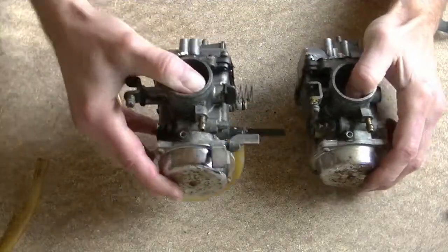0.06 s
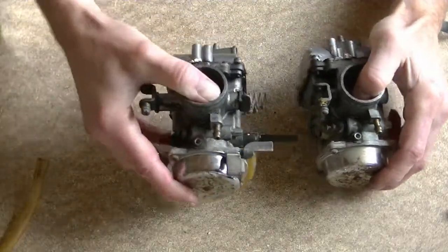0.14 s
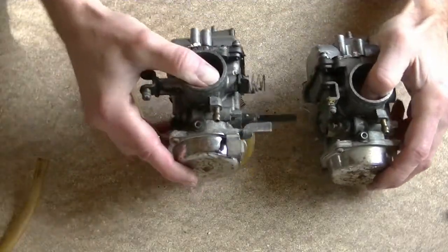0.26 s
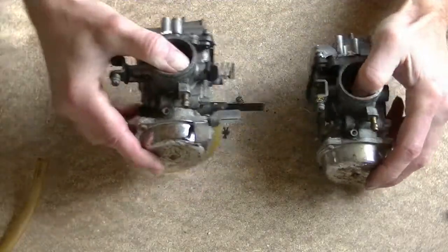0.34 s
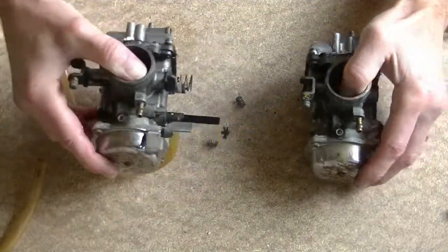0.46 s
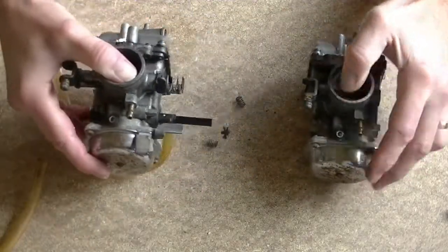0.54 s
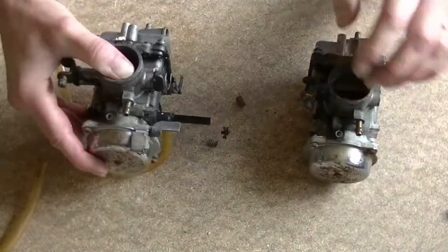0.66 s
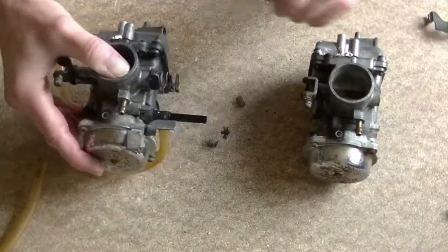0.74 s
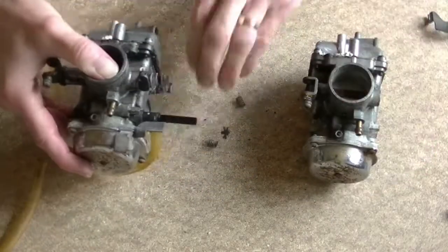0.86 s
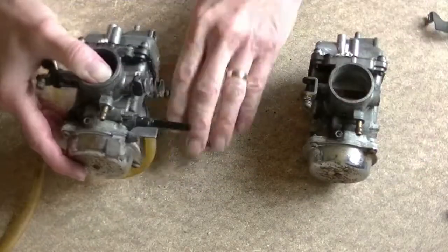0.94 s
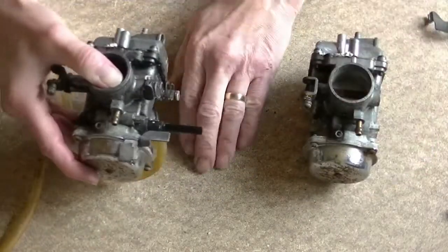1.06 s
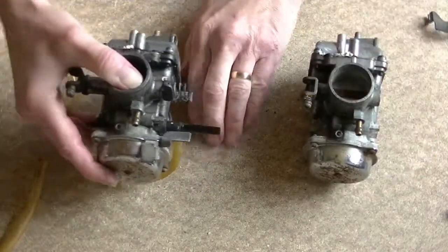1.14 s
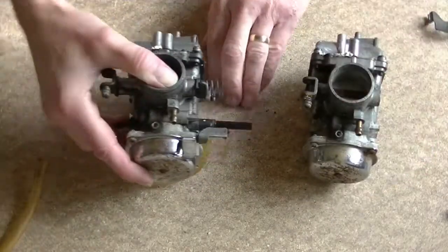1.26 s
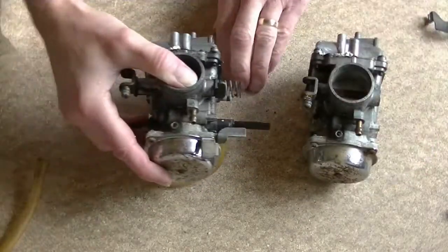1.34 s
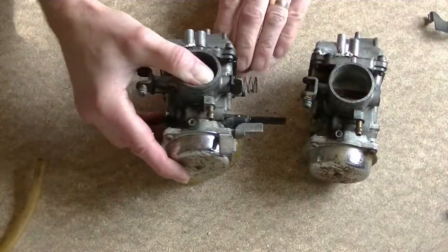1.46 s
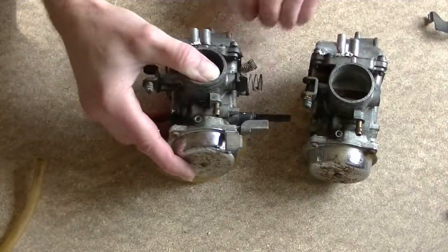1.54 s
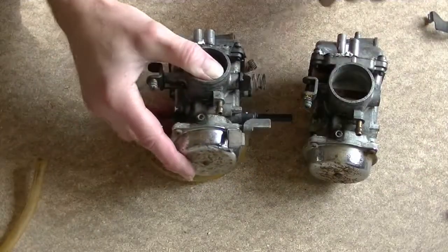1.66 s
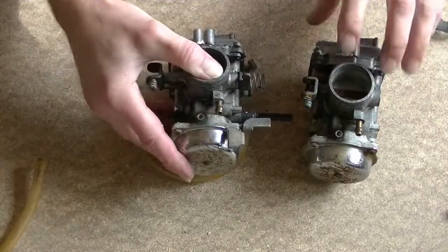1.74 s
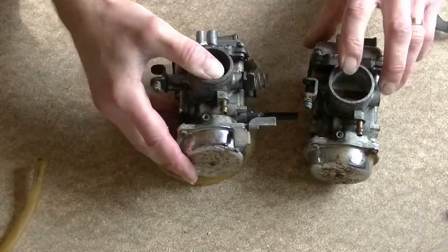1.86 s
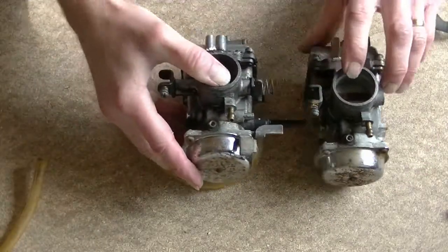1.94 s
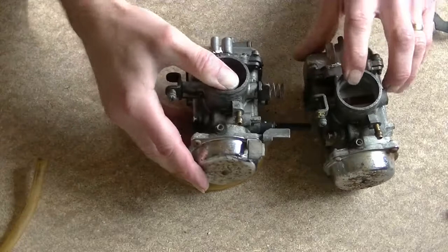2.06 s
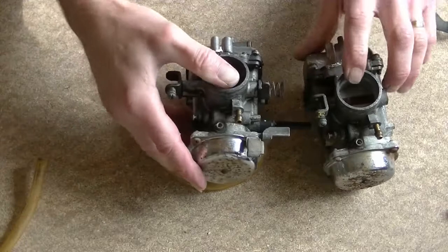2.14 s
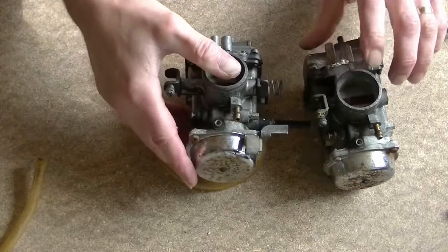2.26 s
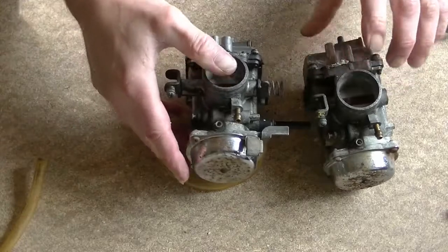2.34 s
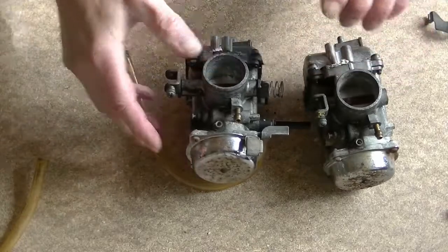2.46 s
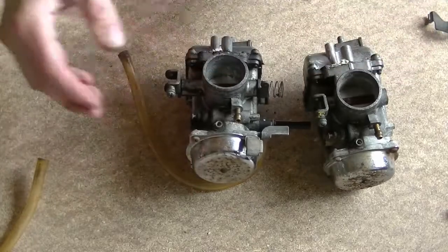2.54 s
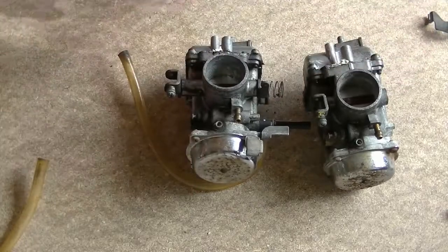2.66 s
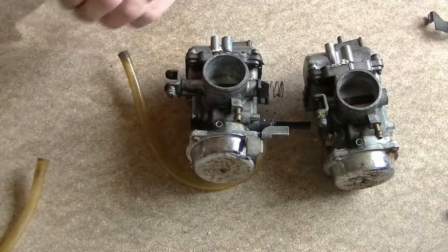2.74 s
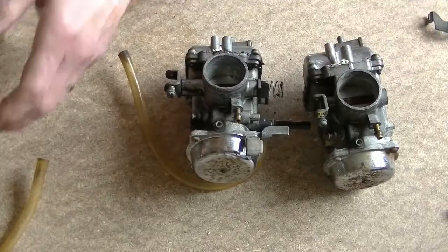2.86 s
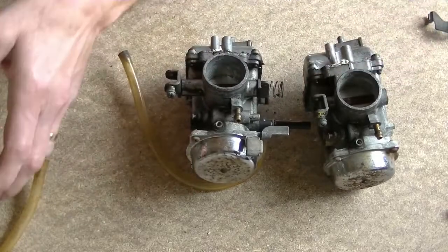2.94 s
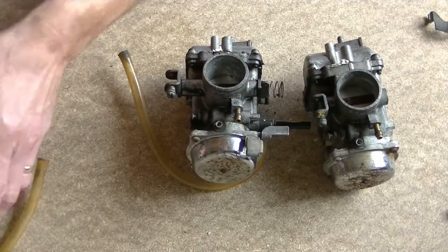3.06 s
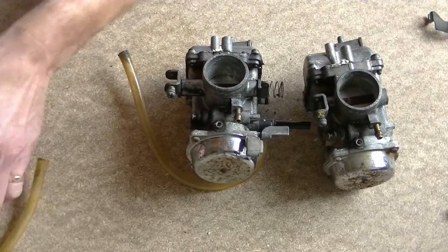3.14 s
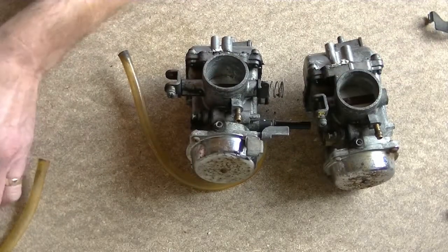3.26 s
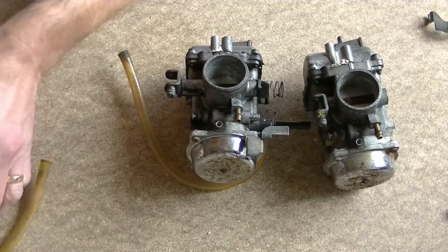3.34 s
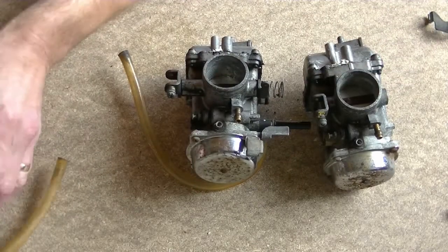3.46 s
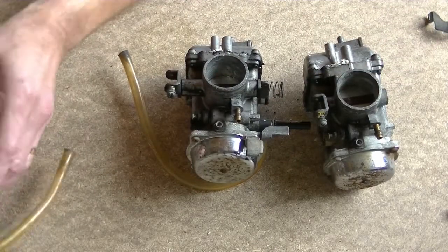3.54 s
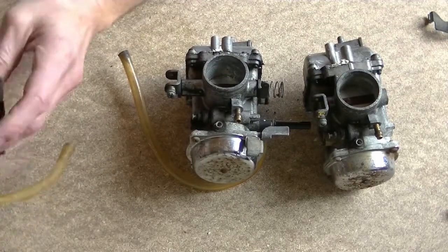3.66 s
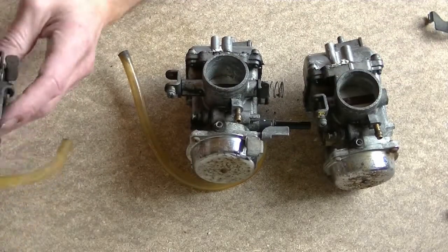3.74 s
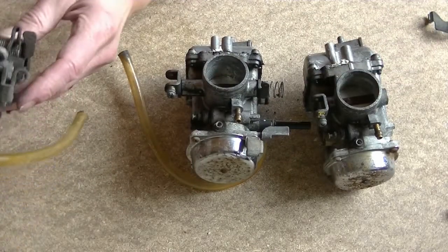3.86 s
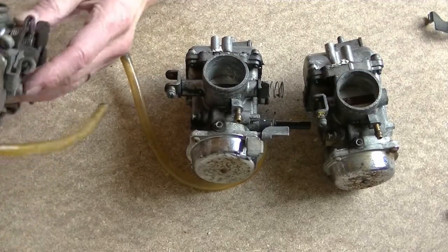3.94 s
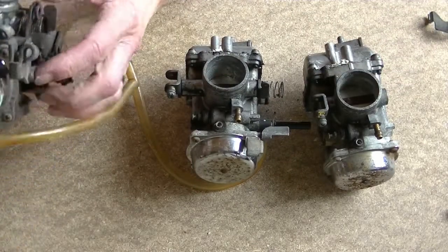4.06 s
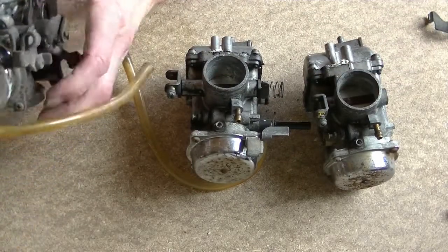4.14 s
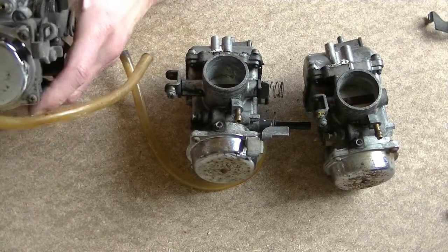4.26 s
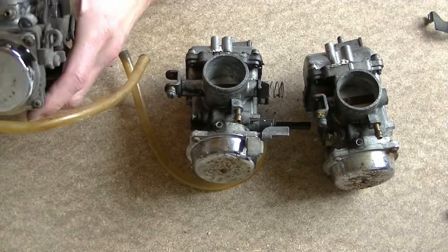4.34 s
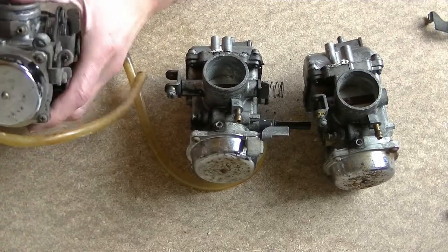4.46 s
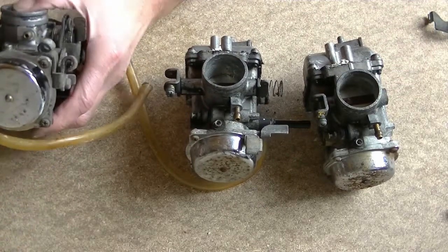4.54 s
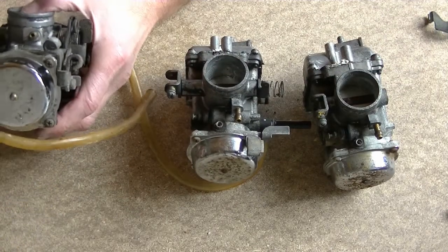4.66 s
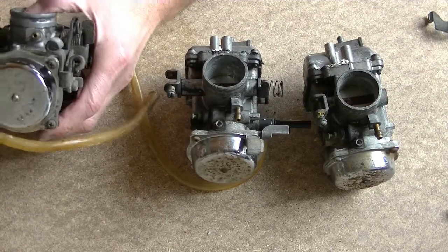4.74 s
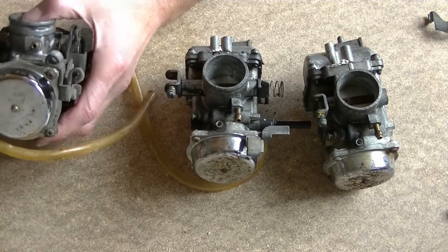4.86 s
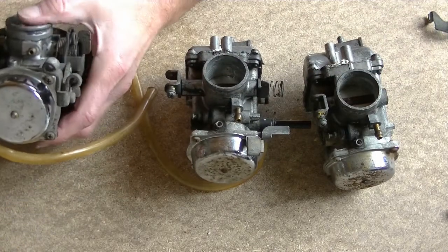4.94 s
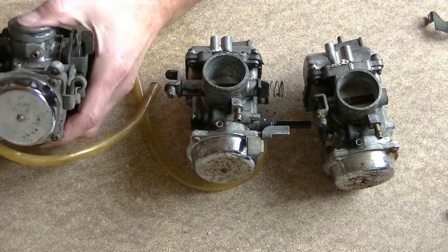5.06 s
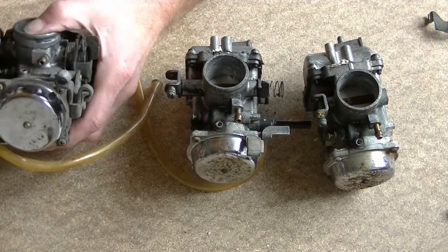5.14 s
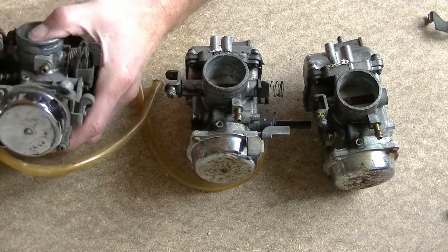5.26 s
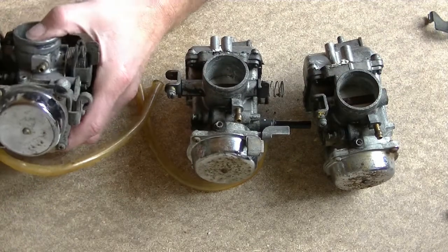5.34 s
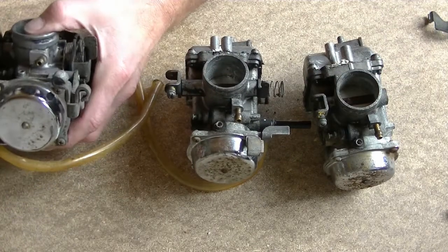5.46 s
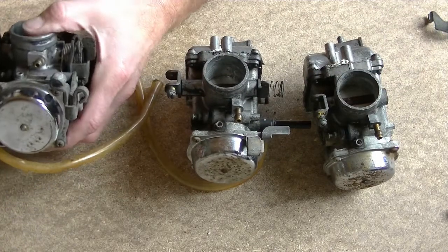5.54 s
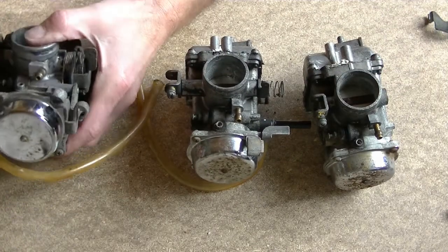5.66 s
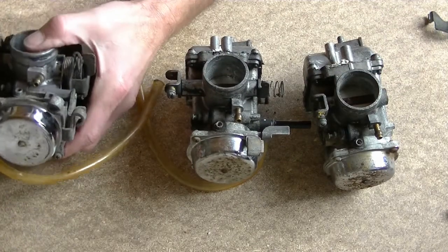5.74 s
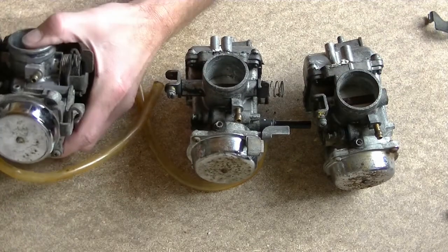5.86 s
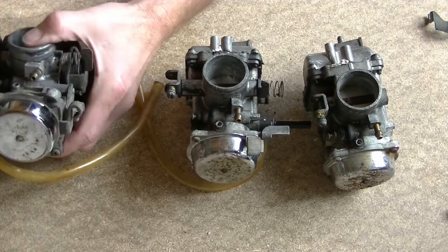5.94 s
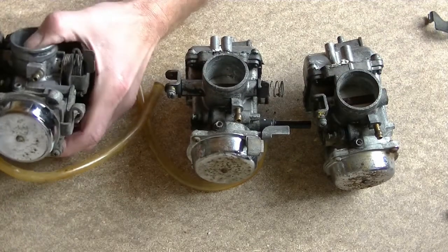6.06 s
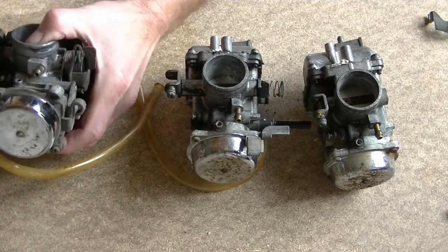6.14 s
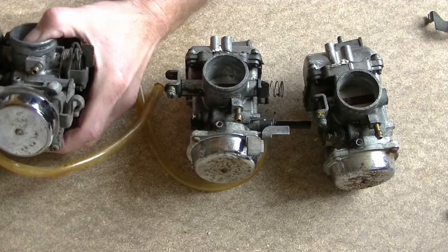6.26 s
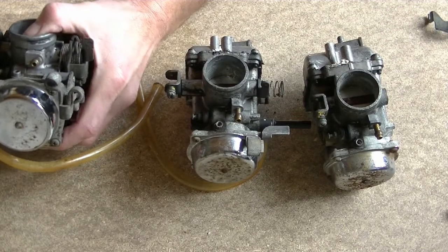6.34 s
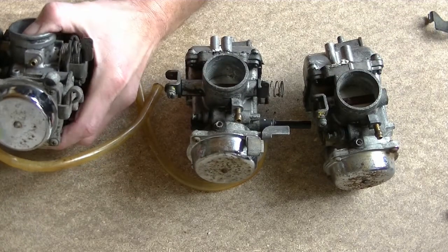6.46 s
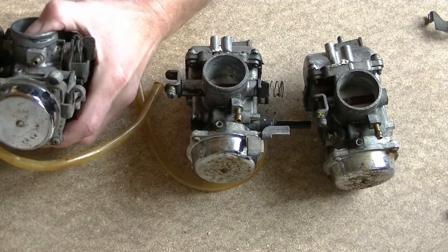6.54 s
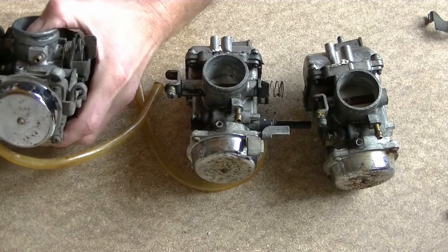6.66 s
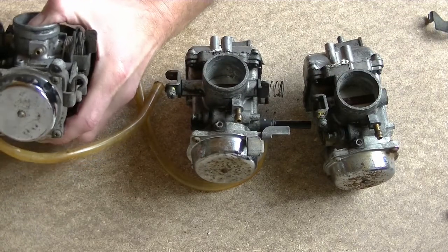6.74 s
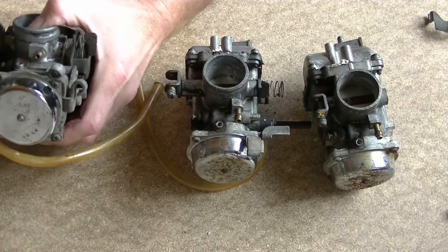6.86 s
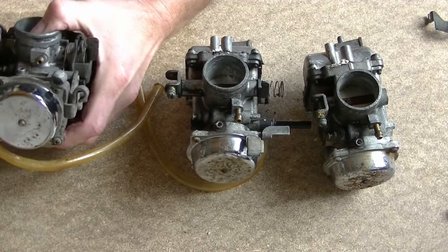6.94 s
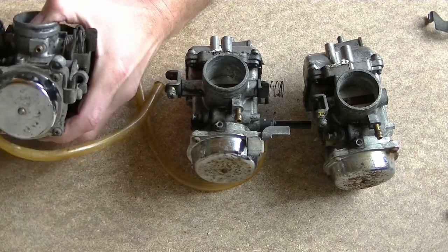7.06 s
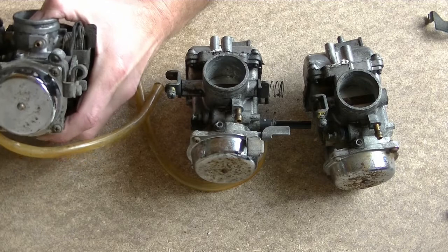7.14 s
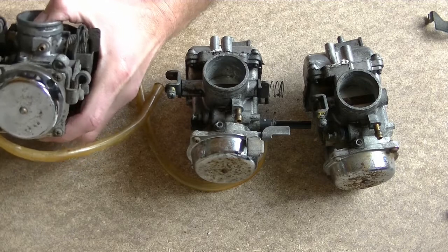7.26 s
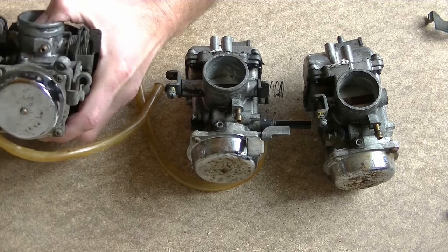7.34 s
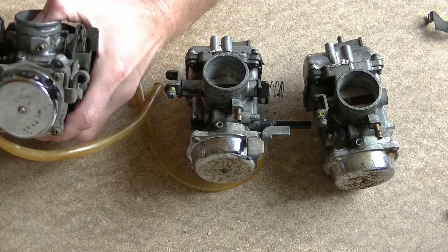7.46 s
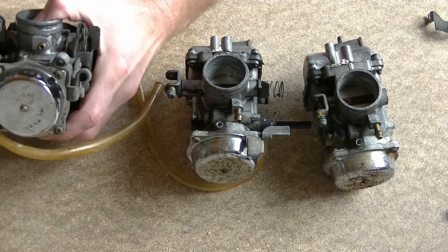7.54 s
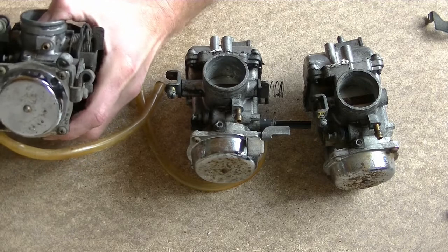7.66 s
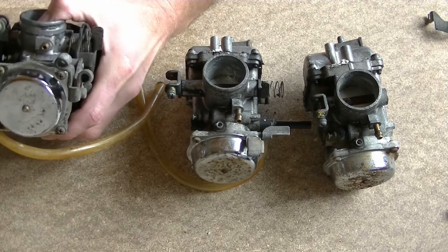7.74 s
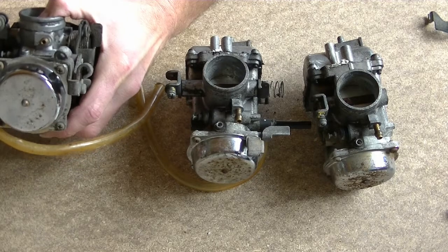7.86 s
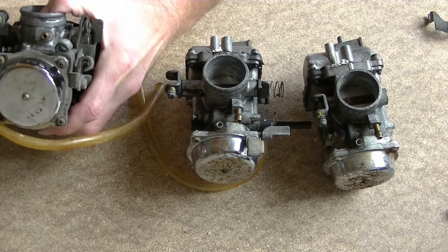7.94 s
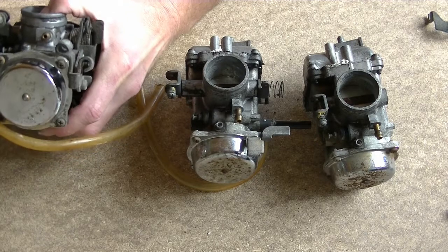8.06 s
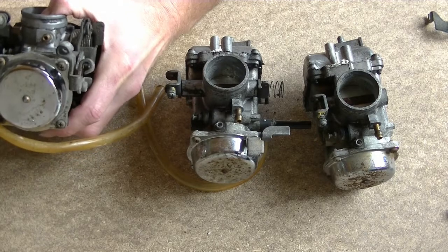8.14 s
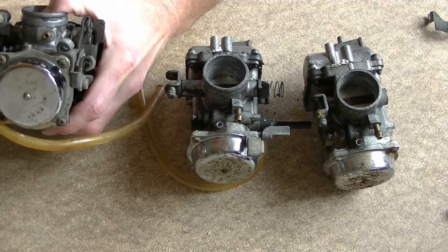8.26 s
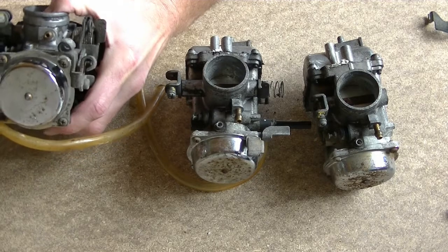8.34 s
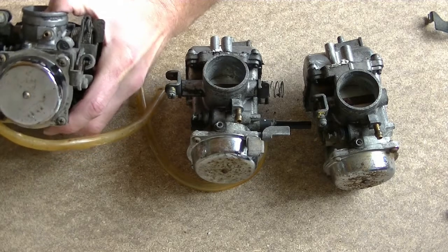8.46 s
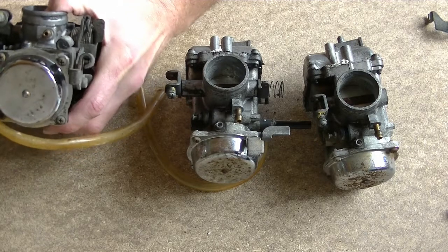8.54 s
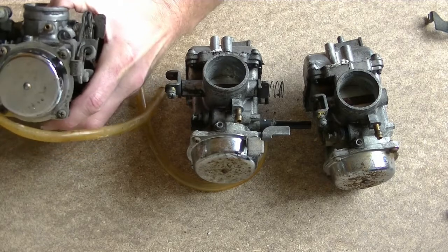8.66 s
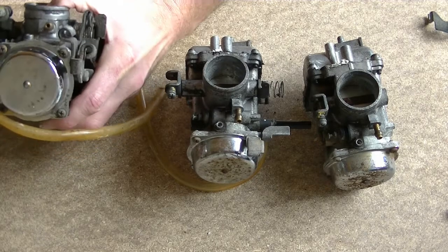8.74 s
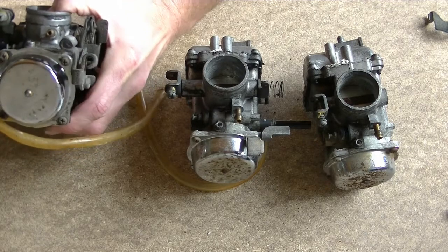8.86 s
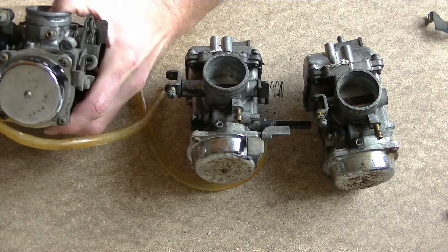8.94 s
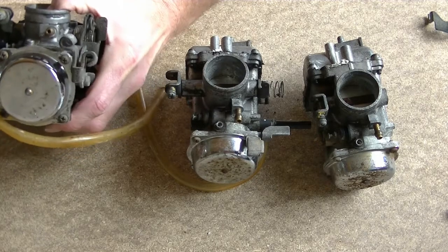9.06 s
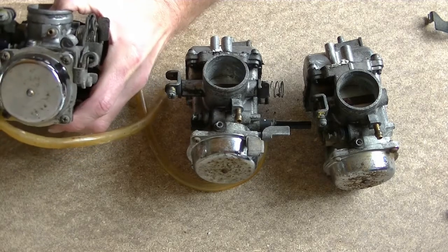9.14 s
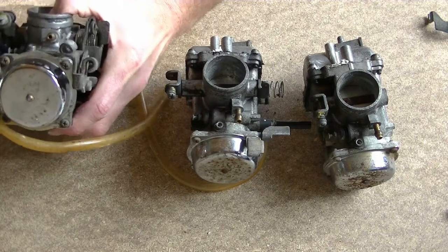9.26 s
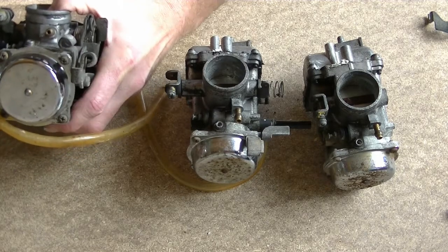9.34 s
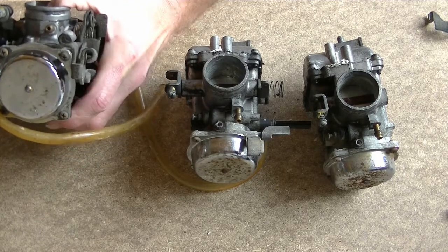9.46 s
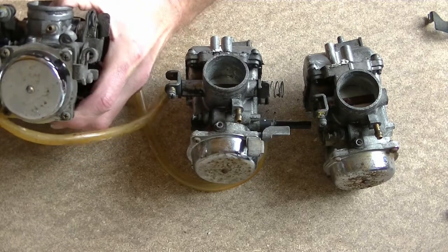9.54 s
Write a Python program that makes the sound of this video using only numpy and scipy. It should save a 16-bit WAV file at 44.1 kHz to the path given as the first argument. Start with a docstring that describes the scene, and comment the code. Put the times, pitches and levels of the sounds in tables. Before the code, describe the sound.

Metal bodies handled on carpet, heard by a nearby stereo microphone with constant soft hiss. A hard clunk comes almost at once, with quick knocks and tiny metallic ticks behind it. Dry brushing, a second knock and short dragging rubs follow. The middle turns quiet, with hose-like rustles, small clicks and muffled bumps; the last second brings low, hollow thuds and a short rub.

```python
"""Carburettors on a carpeted floor

Heavy metal carburettors are set down, dragged and turned by hand on carpeted boards, close to a camera.
Landings ring decaying sines of the boards and castings; small parts tick as short resonant noise.
Hands, hoses and castings rub over the pile as flickering noise, slips squeak, shifting weight thumps.
A small furnished room answers, over the steady hiss of the microphone.
"""
import sys
import numpy as np
from scipy import signal
from scipy.fft import rfft, irfft, next_fast_len
from scipy.io import wavfile
from scipy.ndimage import map_coordinates

SR = 44100
rng = np.random.default_rng(int(sys.argv[2]) if len(sys.argv) > 2 else 0)


def waveform_to_disk(signal):
    """Save audio, clipped to [-1, 1], as 16-bit WAV at the path in sys.argv[1]."""
    frames = np.transpose(np.atleast_2d(signal))
    scaled = np.clip(frames, -1, 1) * 32767
    samples = np.round(scaled).astype(np.int16)
    wavfile.write(sys.argv[1], SR, samples)


N = 422919  # length in samples

# Landings on the carpet, close to the camera; levels are relative:
# start_s, strength_db, boom_db, hollow_db (ring of the casting), clack_db, favoured pitch_hz,
# damping (1 = the listed t60_s, more = shorter ring, less = longer, 0.3 at least),
# shudder_db (drumming afterwards)
LANDINGS = [(0.071, -52, 3, -3, 19, 142.5, 0.6, -80), (0.12, -38, -8, 7, 13, 228.8, 1.33, -70.5),
            (0.384, 6, -19, 0.8, 2.5, 670, 2, -22), (0.54, -31.5, -35, 7, 16, 233, 0.61, -49.5),
            (0.58, -5.5, -10.5, -2.5, -11, 333, 1.5, -44.5),
            (0.613, -6, -13.5, -11, -15, 344.3, 2.3, -41.5),
            (0.636, -16.5, -13, -21, -8, 297.7, 1.6, -42.5), (1.045, -43.5, -26, 3, -2, 568.6, 1.5, -65.5),
            (1.089, -39.5, -27, -2, 7, 583, 0.51, -64.5), (1.592, -42.5, -1, -4, 8, 161.5, 0.51, -65.5),
            (1.677, -5, -15.5, -9.5, -0.5, 560, 1.48, -48.5), (1.885, -28, -37, -16, 9.5, 594, 0.26, -60),
            (2.03, -29, -3.5, -1, 11.5, 596.4, 1.05, -55), (2.821, -37.5, -10.5, 4.5, 0.5, 668, 1.27, -55),
            (2.91, -44, -18, -1, -3, 501, 1.84, -74.5), (3.077, -31, -9.5, 1.5, 8, 190, 1.34, -59.5),
            (3.339, -33, -16, 7, 14, 705, 1.7, -53), (3.549, -42.5, -8, -6, -5, 250, 1.6, -64.5),
            (3.643, -33, -13.5, 4, -11, 240.4, 1.9, -56.5), (3.805, -35, -16, -5, -0.5, 261, 1.7, -62),
            (4.136, -33, -4, -6, -2.2, 580, 1.4, -57), (4.45, -27.5, -10, -1, -7, 659, 2.8, -52),
            (5.136, -23, -11, 1.5, 3.2, 660, 2.1, -53.5), (5.42, -47.5, -1, -2.5, 17.5, 576.3, 1.5, -69.5),
            (5.689, -36, -10, 5, -8, 105.6, 0.89, -58), (7.148, -30.5, -5.5, 0.5, 6, 1000, 1, -58),
            (7.362, -32, 4.5, -0.5, -24, 134, 1.7, -60.5), (7.752, -46, -9, -3, 8.5, 200, 1.8, -75.5),
            (7.842, -38, -12.5, 3.5, 8, 132, 2.1, -67.5), (7.905, -42.5, -4, 2.2, 9, 735.5, 0.88, -69),
            (8.649, -20.5, 2, -2.2, -6.5, 150, 1.8, -39.5), (8.966, -51, 11.5, 1, 1.2, 164, 1.4, -60),
            (9.269, -47, -1.2, 2.2, 11, 1100, 1.1, -69), (9.288, -11.5, 1, 5, 4, 144, 2.9, -30),
            (9.411, -30, 8, -6, 6.5, 250, 2, -43.5)]
# Modes of floorboards and castings: pitch_hz, level_db (relative), t60_s (at damping 1)
BOARD_MODES = [(104, -26, 0.3), (136, 2, 0.3815), (189.3, -0.5, 0.3), (214, 0, 0.31), (249, 0.5, 0.376),
               (271.6, -1.5, 0.2), (343.2, -3, 0.28), (408.7, -10, .2), (477, -13.5, 0.067),
               (586.4, -2.5, 0.077), (596.4, -9, 0.077), (680, -2, 0.15), (712, -2, 0.082),
               (802.6, -6.5, 0.11), (869, -5.5, 0.1477), (970, -16, .15), (1126, -7.5, 0.13),
               (1206, -12, .1), (1320, -12, 0.18), (1452, -13, 0.1), (1620, -19.5, 0.044),
               (1770, -16, 0.092), (1954, -30.5, 0.39), (2166, -17, 0.094), (2465, -29, 0.302),
               (2880, -32, 0.16)]
# Crowd of weak modes, read between points: pitch_hz, level_db (relative), t60_s (at damping 1)
WEAK_MODES = [(120.1, -12, 0.11), (700, -9, 0.18), (1404, -18.5, 0.15), (2916, -26, 0.077),
              (7010, -45, 0.054)]


def knocks(count=70):
    """Each landing rings the boards and a crowd of weak modes; the spot struck favours one pitch."""
    out, t = np.zeros(N + SR), np.arange(SR // 3) / SR
    board_hz, board_db, board_t60 = np.transpose(BOARD_MODES)
    weak_levels = [(hz, db) for hz, db, _ in WEAK_MODES]
    weak_t60s = [(hz, t60) for hz, _, t60 in WEAK_MODES]
    chance = rng.standard_normal((len(LANDINGS), 2, len(BOARD_MODES) + count, 1))
    scatter = np.exp(0.033 * rng.standard_normal((len(LANDINGS), count)))
    crowds = np.geomspace(150, 7000, num=count) * scatter
    # neighbours in the crowd start in opposition
    phase = np.append(np.ones(len(BOARD_MODES)), np.resize([1, -1], count))[:, None]
    rise = 1 - np.exp(-t / .0005)
    for landing, (size, tune), crowd in zip(LANDINGS, chance, crowds):
        s, db, boom_db, hollow_db, clack_db, spot_hz, damping, _ = landing
        hz = np.append(board_hz, crowd)[:, None]
        level = np.append(board_db, along(weak_levels, crowd))[:, None]
        t60 = np.append(board_t60, along(weak_t60s, crowd))[:, None] / max(damping, .3)
        colour_points = [(180, boom_db), (400, 0.0086), (600, 0.0029), (800, hollow_db), (1400, clack_db)]
        colour = along(colour_points, hz)
        favour = 7 * np.exp(-np.log2(hz / spot_hz) ** 2 / 0.034)
        decay = np.exp(-np.log(1000) * t / t60)
        gain = phase * amp(level + colour + favour + 2.84 * size) * decay
        ring = np.sum(gain * np.sin(2 * np.pi * hz * (1 + 0.0067 * tune) * t), axis=0)
        out[round(s * SR):][:len(t)] += amp(db - 15.5) * rise * ring
    return out[:N]


# Small metal parts touching: start_s, level_db (peak before panning), pitch_hz,
# pan_db (left over right), bright_db (bright ring, relative)
PART_TICKS = [(0.1187, -36, 2500, 2, -4.5), (0.385, -24, 1960, -2.5, -1), (0.4599, -35, 1760, 1, -3),
              (0.5058, -25, 2273, 3, -19), (0.541, -41, 1730, -1.5, -6), (0.5504, -38, 1810, 0.5, -6),
              (0.5799, -34.5, 2590, 0, -2), (0.613, -41, 1830, -0.5, -6.5),
              (0.634, -41.5, 1966, -0.5, -3.5), (1.1763, -28.5, 3230, 4.5, -14),
              (1.4822, -34.5, 1680, 3, -6.5), (1.6767, -42.5, 1622, 2, 1), (1.822, -34, 1700, 2, -6),
              (1.9644, -32.5, 2080, 1, -8), (2.0313, -32, 2090, 0.5, -2), (2.0918, -37.5, 3160, 3, -16),
              (2.3365, -41.5, 2690, -6, -13.5), (3.4386, -35.5, 4120, 1.5, 9),
              (4.0537, -37, 3050, 2.5, 2.5), (4.137, -31.5, 2890, 0.1, -26),
              (4.357, -38.5, 2700, -2.5, -9.5), (4.452, -44.5, 1955, 2, 2.5), (4.538, -41.5, 2418, 4, 5),
              (5.4213, -43.5, 2070, 1.5, -10), (7.1536, -46, 2035, 2, 5), (7.8477, -48, 2040, 2, -9),
              (7.9625, -37, 1776, 1.5, -7), (8.1414, -49, 4530, 4, 2.5), (8.6488, -39.5, 2104, 0, -16),
              (9.2898, -45, 1750, 4, 1)]
TICK_T60_S = .016  # decay of the noise that drives the tick


def ticks():
    """A short crack of noise, ringing around one pitch and in a bright mode of the casting."""
    out, t = np.zeros((2, N + SR)), np.arange(SR // 8) / SR
    noises = rng.standard_normal((len(PART_TICKS), len(t)))
    for (s, db, hz, pan_db, bright_db), noise in zip(PART_TICKS, noises):
        modes = resonances([(hz, 0.27 * hz, 0), (4800, 900, bright_db), (8000, 6000, bright_db - 16.5)])
        crack = filtered(noise * amp(-60 * t / TICK_T60_S), modes)
        crack = amp(db) * crack / np.max(abs(crack))
        out[:, round(s * SR):][:, :len(t)] += panned(crack, np.full(len(t), pan_db))
    return out[:, :N]


# Strokes over the pile; rise and fall are times for 20 dB: start_s (full level), rise_s, hold_s, fall_s,
# rasp_db, bright_db (fuzz over rasp), drum_db (boards), drum pitch_hz (centre), ring of the casting (0-4)
PILE_STROKES = [(.07, 0.044, 0.065, 0.16, -61, -2.5, -56, 228, 1.1),
                (0.222, 0.0588, .01, 0.081, -61, -12, -62.5, 392, 1),
                (.41, .02, .02, .15, -41, -19.5, -39.5, 600, .6),
                (0.504, .006, 0.0023, 0.052, -42, -28, -43, 624, .4),
                (0.548, .06, 0.0078, 0.017, -45.5, -24.5, -31, 381.3, 1),
                (.69, .04, .08, .08, -56.5, 0.5, -55, 259.5, 0.81),
                (0.989, .05, .005, 0.038, -59, -9.5, -55, 370.6, 1.8),
                (1.135, .07, 0.032, .02, -48.5, -2, -60.5, 722, 1.6),
                (1.173, .01, 0.13, 0.17, -39, -5, -58, 620, 2.58),
                (1.414, .1, 0.078, 0.078, -51.5, -17, -55, 790, 0.77),
                (1.578, .03, 0.15, .02, -67, -3, -61.5, 190, 1.2),
                (1.824, .025, 0.0027, 0.029, -48, -6, -64, 534, 0.9),
                (1.877, .06, 0.088, 0.15, -46, -11, -39, 577, 2.8),
                (2.044, 0.023, .003, 0.044, -44, -7, -43, 445, 3.5),
                (2.823, 0.0097, 0.0055, .11, -53.5, -8, -61.5, 588, 1.2),
                (3.086, 0.055, 0.077, 0.058, -57.5, -5.5, -56.5, 500, 1.14),
                (3.22, 0.058, 0.0036, .02, -67, -2, -54.5, 399.6, 1.2),
                (3.393, 0.087, 0.0043, 0.042, -51, -18, -43.5, 516, 1.3),
                (3.434, .008, .003, 0.1, -54.5, -1, -51, 510, 1.5),
                (3.488, .012, .13, 0.034, -51, -0.5, -57, 301.7, 0.9),
                (3.647, 0.049, 0.0053, .1, -53.5, 5, -56.5, 300, 1.8),
                (3.683, .05, 0.45, 0.046, -57.5, 2.5, -64.5, 269.6, 1.33),
                (3.9, .04, .01, .08, -53, 0.13, -62, 248.8, 1.2),
                (4.136, 0.048, .003, 0.041, -40.5, -3, -51.5, 344.5, 1.4),
                (4.173, 0.016, 0.04, 0.13, -50, -3, -59.5, 200, 0.68),
                (4.297, .02, 0.14, 0.022, -67.5, -3, -67.5, 321, 1.8),
                (4.454, .012, .11, 0.16, -53, -4, -61, 504, 1.28),
                (4.734, 0.16, .005, 0.061, -64.5, -3, -60, 461, 1.3),
                (4.813, .05, .005, 0.047, -65.5, 7.5, -62.5, 404, 1.36),
                (4.994, .15, 0.006, 0.056, -62.5, -0.5, -63.5, 300, 1.4),
                (5.119, .07, .005, 0.019, -58, -10.5, -59.5, 680, 0.78),
                (5.687, .07, .01, .13, -64, -11, -47, 260, 1.1),
                (7.15, .04, .01, .07, -60, -5, -43, 300, 1.2),
                (7.579, .03, 0.15, 0.22, -67.5, -0.5, -62, 328.7, 1),
                (7.972, 0.042, 0.0039, 0.025, -54.5, -9.5, -54.5, 357, 0.95),
                (8.294, .02, .003, 0.048, -62, -5, -68.5, 389, 1.3),
                (8.761, .03, .005, 0.12, -73, -7.5, -54.5, 196.3, 1.3),
                (8.859, .06, 0.035, .04, -72.5, -7.5, -58, 220, 1.1),
                (8.985, 0.068, .005, 0.097, -62.5, -17, -46.5, 189.5, 1.13),
                (9.129, .05, 0.046, .05, -69, -8.5, -61, 299, 0.95),
                (9.32, .03, .03, .05, -54, -10, -49.5, 230, 1.3),
                (9.568, .1, 0.0047, 0.051, -57, -13.5, -59, 300.3, .9)]
# Rasp of the pile: pitch_hz, level_db (per Hz, relative)
RASP_SPECTRUM = [(240, -58.5), (400, -36), (574, -11.5), (895, -2), (1050, -2), (1170, -3), (1890, 0.5),
                 (2680, -3), (3270, -3.5), (6500, -20), (8450, -43), (14300, -120)]
# Finest fibres: pitch_hz, level_db (per Hz, relative)
FUZZ_SPECTRUM = [(2940, -15), (5000, 1.5), (6160, -3), (7600, -4), (7940, -6.5), (13800, -14), (16000, -19)]
# Hollow of the dragged casting: pitch_hz, width_hz, level_db (relative)
CASTING_MODES = [(551.4, 59.5, 4.5), (694, 67, -5), (1322, 14, -11), (2120, 76.1, 1), (2730, 23, -4),
                 (3285, 31, 0.5), (3706, 62, -11.5), (4710, 181.2, -0.5), (5337, 140, -16)]
# centre of a dull rasp, its climb at brightness 0 dB; left over right
RASP_HZ, BRIGHT_HZ, RASP_PAN_DB = 1800, 1500, 0.3


def strokes():
    """Fibres flick past the moving part; the drag also shakes the casting and the boards."""
    (rasp_gain, fuzz_gain, drum_gain), (rasp_hz, drum_hz, ring) = stroke_controls()
    flicks = filtered(fibres(2.3, 260), lambda f: amp(along(RASP_SPECTRUM, f)))
    rasp = moving_hump(flicks, rasp_hz, 5.4, .5, size=512)
    rasp = rasp + np.clip(ring, 0, 4) * 0.44 * unit(filtered(flicks, resonances(CASTING_MODES)))
    fuzz, spread = (unit(filtered(fibres(1.27, 350), lambda f: amp(along(FUZZ_SPECTRUM, f))))
                    for _ in "ab")
    boards = resonances([(hz, 6.7 / t60, db) for hz, db, t60 in BOARD_MODES])
    drum = moving_hump(filtered(fibres(2.5, 120), boards), drum_hz, 11.0, 1.0, size=2048)
    wide = 0.4 * fuzz_gain * spread * [[1], [-1]]  # short waves reach the two microphone ports unalike
    rubbing = panned(rasp_gain * rasp + fuzz_gain * fuzz, np.full(N, RASP_PAN_DB))
    return rubbing + wide + drum_gain * drum


def stroke_controls():
    """Gains of rasp, fuzz and drumming, then centres and ring; where strokes overlap the louder one leads."""
    t, power = np.arange(N) / SR, np.full((3, N), 1e-12)
    lead = power * [[RASP_HZ], [SHUDDER_LOW_HZ], [1]]
    for s, rise, hold, fall, rasp_db, bright_db, drum_db, drum_hz, ring in PILE_STROKES + shudders():
        span = slice(max(int((s - 2 * rise) * SR), 0), int((s + hold + 3 * fall) * SR))
        slopes = np.minimum((t[span] - s) / rise, (s + hold - t[span]) / fall)
        shape_db = 20 * np.minimum(slopes, 0)
        rasp, fuzz, drum = (amp(2 * (shape_db + db)) for db in (rasp_db, rasp_db + bright_db, drum_db))
        power[:, span] += [rasp, fuzz, drum]
        centre_hz = RASP_HZ + BRIGHT_HZ * min(amp(bright_db), 1.3)
        lead[:, span] += [rasp * centre_hz, drum * drum_hz, rasp * ring]
    return np.sqrt(power), lead / power[[0, 2, 0]]  # averages weighted by power


# rasp under the drumming, brightness, lowest drumming centre, ring of the casting
SHUDDER_RASP_DB, SHUDDER_BRIGHT_DB, SHUDDER_LOW_HZ, SHUDDER_RING = -23.5, -17.5, 215, 0.28
# delay after the landing to full level, then rise and fall for 20 dB around the hold
SHUDDER_DELAY_S, SHUDDER_RISE_S, SHUDDER_HOLD_S, SHUDDER_FALL_S = .014, 0.004, 0.022, 0.085


def shudders():
    """A landed casting shudders on the pile: a short stroke, drumming near the landing's favoured pitch."""
    rows = []
    for s, *_, spot_hz, _, db in LANDINGS:
        times = (s + SHUDDER_DELAY_S, SHUDDER_RISE_S, SHUDDER_HOLD_S, SHUDDER_FALL_S)
        levels = (db + SHUDDER_RASP_DB, SHUDDER_BRIGHT_DB, db)
        rows.append(times + levels + (max(spot_hz, SHUDDER_LOW_HZ), SHUDDER_RING))
    return rows


def fibres(grain_db, rate):
    """Noise of fibres letting go: its level jumps quickly at random."""
    return rng.standard_normal(N) * amp(grain_db * wobble(rate) + 1.2 * wobble(25))


# A hose or finger slips on metal: start_s, end_s, level_db,
# bands of (pitch_hz, width_hz, level_db (relative, applied twice))
SLIPS = [(3.116, 3.2, -62, [(5290, 250, -2), (7250, 210, -2), (7870, 250, -0.5), (9350, 700, -1.5)]),
         (1.33, 1.58, -55, [(1720, 260, 0), (3650, 200, -8)]), (4.63, 4.85, -61.5, [(1397, 190, -1),
         (4320, 300, -5.5), (6440, 400, -7)]), (8.28, 8.335, -66, [(1750, 250, 0), (2900, 500, -4)])]


def squeak():
    """Brief stick-slip noise in a few narrow bands."""
    out, t = np.zeros(N), np.arange(N) / SR
    for start, end, db, bands in SLIPS:
        shape = np.clip(np.minimum((t - start) / 0.0048, (end - t) / .015), 0, 1)
        # squaring the response steepens each band
        slip = filtered(fibres(3.1, 240), lambda f: resonances(bands)(f) ** 2)
        out += amp(db) * shape * unit(slip)
    return out


# Weight shifting on the floor: start_s, level_db (before the soft rise), pitch_hz, t60_s
WEIGHT_SHIFTS = [(4.14, -45.5, 96, 0.29), (5.137, -46, 80, 0.18), (5.695, -43.5, 95.7, 0.33),
                 (7.15, -51, 89.5, 0.3)]


def thumps():
    """A soft, deep push into the joists: a decaying sine with a gentle rise."""
    out, t = np.zeros(N + SR), np.arange(SR // 2) / SR
    for s, db, hz, t60 in WEIGHT_SHIFTS:
        push = amp(db - 60 * t / t60) * (1 - np.exp(-t / 0.011))
        out[round(s * SR):][:len(t)] += push * np.sin(2 * np.pi * hz * t)
    return out[:N]


# Decay of the small furnished room: pitch_hz, t60_s
ROOM_DECAY = [(100, 0.18), (1000, .3), (4000, 0.24), (12000, 0.26)]
# Left-right likeness of its answer: pitch_hz, likeness (1 = same)
ROOM_LIKENESS = [(150, 0.97), (1000, 0.81), (4000, 0.39), (12000, .1)]


def room(x):
    """Each frequency of the room's answer dies at its own speed; both sides share the bass."""
    hz, t, z = signal.stft(rng.standard_normal((2, SR // 2)), SR, nperseg=256)
    turn = np.arccos(np.clip(along(ROOM_LIKENESS, hz), 0, 1))[:, None] / 2
    shared, apart = z[0] * np.cos(turn), z[1] * np.sin(turn)
    dying = np.array([shared + apart, shared - apart]) * amp(-60 * t / along(ROOM_DECAY, hz)[:, None])
    tail = signal.istft(dying, SR, nperseg=256)[1]
    late = np.pad(x, ((0, 0), (220, 0)))  # the answer starts 5 ms late
    return signal.fftconvolve(late, tail / np.linalg.norm(tail[0]), axes=1)[:, :N]


# Room tone and microphone noise: pitch_hz, level_db (per Hz, relative)
HISS_SPECTRUM = [(13, -42.5), (22, -14), (70, -13.5), (249, -1.5), (278, -6), (302, -4), (387, -6),
                 (432, -5.5), (935, -9), (1620, -12.5), (2140, -15), (7810, -23), (16000, -29)]
# Left-right likeness of the hiss: pitch_hz, likeness (1 = same, -1 = opposed)
HISS_LIKENESS = [(60, 0.11), (180, -0.37), (550, -0.6), (1650, 0.029), (4970, 0.12), (15000, 0.208)]
# Faint tones: pitch_hz, level_db (relative)
FAINT_TONES = [(1572, -87.5), (2266, -82.5), (7812, -91)]
HISS_DB = -55  # rms, before its slight wavering


def hiss():
    """Steady room tone and microphone noise, partly shared by both sides, with faint wavering tones."""
    turn = lambda hz: np.arccos(np.clip(along(HISS_LIKENESS, hz), -1, 1)) / 2
    colour = lambda hz: amp(along(HISS_SPECTRUM, hz)) * [np.cos(turn(hz)), np.sin(turn(hz))]
    mid, side = filtered(rng.standard_normal((2, N)), colour)
    t = np.arange(N) / SR
    tones = sum(amp(db + 7.5 + 2 * wobble(3)) * np.sin(2 * np.pi * hz * t + 0.92 * wobble(4.5))
                for hz, db in FAINT_TONES)
    return amp(HISS_DB + 0.631 * wobble(3.4)) * unit(np.array([mid + side, mid - side])) + tones


def amp(db):
    """Decibels to gain."""
    return 10 ** (np.asarray(db) / 20)


def unit(x):
    """Scale to rms 1."""
    return x / np.sqrt(np.mean(x ** 2) + 1e-20)


def along(points, hz):
    """Read (Hz, value) points on a log frequency axis."""
    f, v = np.transpose(points)
    return np.interp(np.log(hz + 1), np.log(f + 1), v)


def filtered(x, response):
    """Shape the spectrum of x by a complex response of frequency."""
    m = next_fast_len(x.shape[-1] + 8192)  # room for the ringing to die
    return irfft(rfft(x, m) * response(np.fft.rfftfreq(m, 1 / SR)), m)[..., :x.shape[-1]]


def resonances(modes):
    """Causal sum of (Hz, width in Hz, dB) resonances with alternating signs."""
    return lambda f: sum((-1) ** k * amp(db) * 1j * f * w / (c * c - f * f + 1j * f * w)
                         for k, (c, w, db) in enumerate(modes))


def wobble(rate):
    """A smooth random curve, rate knots a second (400 at most)."""
    return map_coordinates(rng.standard_normal(int(N * 400 / SR) + 4), [np.arange(N) * rate / SR])


def panned(x, pan_db):
    """Mono to two channels; positive leans left."""
    return x * amp(np.array([pan_db / 2, -pan_db / 2]))


def moving_hump(x, centre_hz, lift_db, octaves, size):
    """A broad hump in the spectrum that follows the given centre, at steady total power."""
    hz, t, z = signal.stft(x, SR, nperseg=size)
    centre = centre_hz[np.minimum((t * SR).astype(int), N - 1)]
    hump = amp(lift_db * np.exp(-(np.log2((hz[:, None] + 1) / centre) / octaves) ** 2))
    power = np.mean(abs(z) ** 2, axis=1, keepdims=True)
    hump = hump / np.sqrt(np.sum(power * hump ** 2, axis=0))
    return unit(signal.istft(z * hump, SR, nperseg=size)[1][:N])


def scene():
    """Close sources and their echo, thinned in the deep bass, then the thumps and the hiss."""
    hits = panned(knocks(), np.full(N, -.5)) + ticks()
    rubs = strokes() + squeak()
    near = hits + rubs + room(amp(-10.0) * hits + amp(-11.5) * rubs)
    # high-pass: the close sounds are thin in the deep bass
    high_pass = signal.butter(4, 122, "high", fs=SR, output="sos")
    return signal.sosfilt(high_pass, near) + thumps() + hiss()


TOP_HZ = 15760  # band limit of the camera


def record(dry):
    """The camera clips at full scale and keeps nothing above its band limit."""
    return filtered(np.clip(dry, -1, 1), lambda hz: hz < TOP_HZ)


dry = scene()
out = record(dry)
waveform_to_disk(out)
```